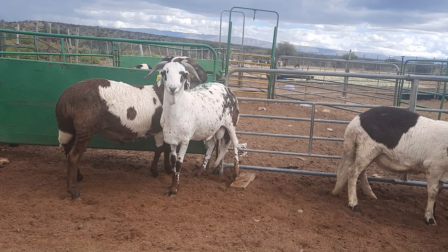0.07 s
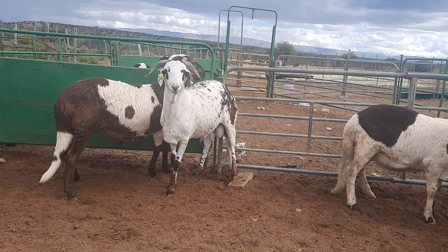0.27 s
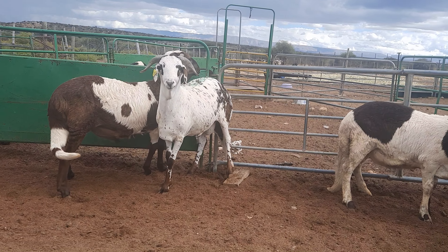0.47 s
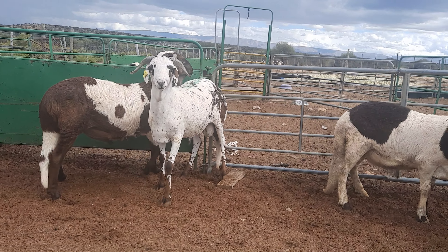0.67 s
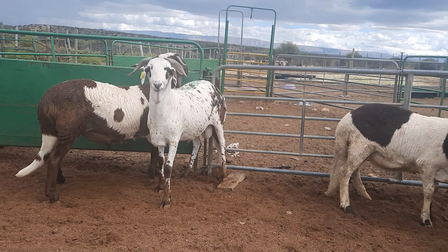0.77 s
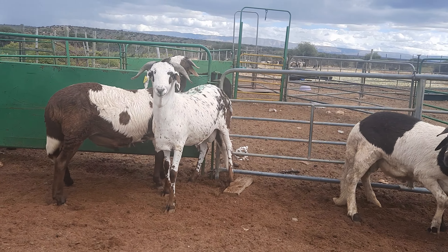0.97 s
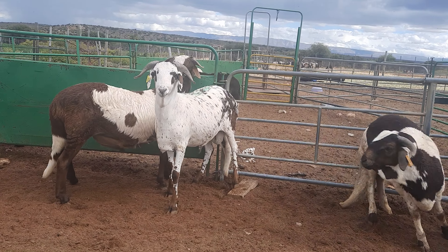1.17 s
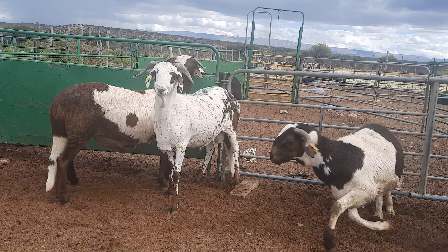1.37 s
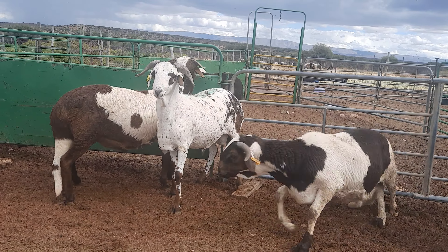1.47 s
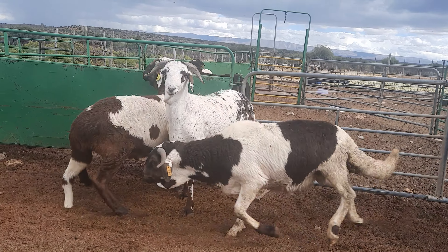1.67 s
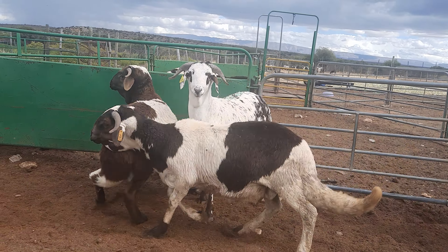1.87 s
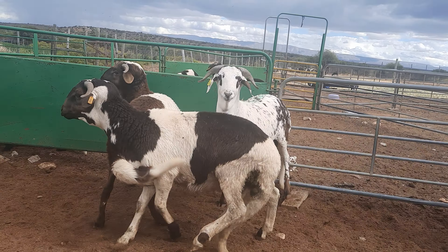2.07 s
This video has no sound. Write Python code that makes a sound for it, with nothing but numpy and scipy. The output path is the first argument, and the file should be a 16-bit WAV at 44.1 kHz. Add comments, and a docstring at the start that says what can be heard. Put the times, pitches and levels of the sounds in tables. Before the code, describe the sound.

Sheep hooves move on dirt in an open-air pen. Faint birds chirp from the start, with a brighter slurred whistle at 0.2-0.35 s. Low wind buffets the microphone at 0.2-0.6 s; scuffs and dull knocks cluster at 0.45-0.7 s. A sharp gritty tick comes at 1 s, a quick warble at 1.15 s, trotting scuffs at 1.25-1.55 s, soft thuds near 1.8 s, and a dry clack at 2.04 s.

```python
"""Sheep shift and trot on the dirt of an open-air pen, over coloured background noise.
Birds chirp and twitter from the start: wavering sine whistles with echoes. A gust of port noise swells at 0.2 s.
Ground rumble, a faint resonant drone and a close rubbing hiss grow; hooves scuff (grain showers) and
knock (damped sines). Grit ticks (filtered bursts) at 1 s and 1.8 s; a modal clack comes at 2.04 s."""
import sys
import numpy as np
from scipy import signal
from scipy.fft import rfft, irfft
from scipy.io import wavfile
from scipy.ndimage import uniform_filter1d

SR = 44100
rng = np.random.default_rng(int(sys.argv[2]) if len(sys.argv) > 2 else 0)


def digitize_waveform(pressure):
    """Quantize a signal to 16-bit integers and store it at the path in sys.argv[1].

    Rows of a 2-D input are taken as channels; values are limited to [-1, 1].
    """
    field = np.atleast_2d(pressure).T
    bounded = np.clip(field, -1, 1)
    quanta = np.round(bounded * 32767).astype(np.int16)
    wavfile.write(sys.argv[1], SR, quanta)


N = 94815
T, HZ = np.arange(N) / SR, np.fft.rfftfreq(N, 1 / SR)

# Spectrum of hooves on dirt. Each row: frequency in Hz, level in dB.
DIRT_SPECTRUM = [(100, -12), (350, -2), (680, -6), (1100, 1), (1600, 0.5), (2200, 4.5), (3400, -5),
                 (5000, -10.5), (8000, -22.5), (10000, -24.5), (16000, -62)]
FAR_T60_S = 0.16  # echoes of chirps and twitter
TICK_ECHO_DB, TICK_T60_S = -18, 0.13  # ticks and clack thrown back by the pen


def amp(db):
    """Decibels to gain."""
    return 10 ** (np.asarray(db) / 20)


def unit(x):
    """Scales to rms 1."""
    return x / np.sqrt(np.mean(x ** 2) + 1e-20)


def curve(points, t=T, axis=1):
    """Reads one column of a table over time."""
    p = np.array(points)
    return np.interp(t, p[:, 0], p[:, axis])


def over_hz(points):
    """Reads a spectrum on a log-frequency axis."""
    f, v = np.transpose(points)
    return np.interp(np.log(HZ + 1), np.log(f), v)


def pan(db):
    """Left and right gains of equal total power; positive dB is left."""
    return unit(amp([[db / 2], [-db / 2]]))


def add(mix, s, sound):
    """Mixes a sound in at time s."""
    part = mix[..., max(round(s * SR), 0):][..., :sound.shape[-1]]
    part += sound[..., :part.shape[-1]]


def late(x, s):
    """Delays a signal by s seconds."""
    return irfft(rfft(x) * np.exp(-2j * np.pi * HZ * s), N)


def colour(x, spectrum, tilt_db=0):
    """Filters by a spectrum and a tilt in dB per octave, then scales to rms 1."""
    tilt = tilt_db * np.log2(np.maximum(HZ, 300) / 1000)
    return unit(irfft(rfft(x) * amp(over_hz(spectrum) + tilt), N))


def wander(hz):
    """Smooth random motion of rms 1 up to about a rate."""
    return unit(irfft(rfft(rng.standard_normal(N)) * np.exp(-(HZ / hz) ** 2), N))


def diffuse(x):
    """Two unrelated signals become a port pair, alike in the bass."""
    # Each row: frequency in Hz, left-right coherence.
    coherence = [(30, 0.87), (150, 1), (300, 0.91), (640, 0.59), (1400, 0.066), (3100, -0.086),
                 (16000, 0.0028)]
    a, b = rfft(x)
    c = np.clip(over_hz(coherence), -1, 1)
    return irfft(np.array([a, c * a + np.sqrt(1 - c ** 2) * b]), N)


def noise(spectrum):
    """Diffuse stereo noise of a given colour."""
    return colour(diffuse(rng.standard_normal((2, N))), spectrum)


def steady(x, size=1500):
    """Takes slow chance swells out of a noise, so that its control sets the level."""
    power = np.atleast_2d(x ** 2).mean(0)
    power = uniform_filter1d(uniform_filter1d(power, size), size)
    return x / np.sqrt(abs(power) + 1e-6)


def resonance(hz, width_hz):
    """Stereo noise in one resonance that follows a pitch curve."""
    turn = np.exp(2j * np.pi * np.cumsum(hz * np.ones(N)) / SR)
    r = np.exp(-np.pi * width_hz / SR)
    # shift down to 0 Hz, filter there, shift back
    base = diffuse(rng.standard_normal((2, N))) / turn
    return unit((turn * signal.lfilter([1], np.poly([r, r]), base)).real)


def yard(x, t60_s):
    """Sparse random echoes off rails and panels, dying away exponentially."""
    t = T[:SR // 2]
    hits = rng.random((2, len(t))) < 2000 / SR
    taps = rng.standard_normal((2, len(t))) * hits * (t > .004) * amp(-60 * t / t60_s)
    return signal.fftconvolve(x, unit(taps) / np.sqrt(len(t)), axes=1)[:, :N]


def dull(x):
    """Echoes lose their treble on the way."""
    corner_hz = 6050
    return irfft(rfft(x) / np.sqrt(1 + (HZ / corner_hz) ** 6), N)


def air():
    """Open-air background: coloured diffuse noise whose level wavers."""
    # Each row: frequency in Hz, level in dB.
    air_spectrum = [(30, 13), (100, 17.5), (300, 7), (600, -1), (1100, -2.5), (1800, -6), (2800, -3),
                    (4200, -1.5), (5600, -2), (7000, -7.5), (10000, -13), (16000, -15)]
    # Each row: time in seconds, level in dB.
    air_level = [(0, -67), (.2, -68), (.36, -58.5), (.8, -63), (.95, -65.5), (1.15, -59.5), (1.65, -66),
                 (1.88, -61), (2, -66), (2.15, -58.5)]
    return amp(curve(air_level) + wander(33)) * noise(air_spectrum) * pan(-3.5)


def birds():
    """Nearly pure, slightly wavering whistles that reach the right port first, with echoes."""
    # Slurred notes and a quick warble of the nearest birds, a list of points per note.
    # Each point: time in seconds, pitch in Hz, level in dB before the near gain.
    song_notes = [
        [(.210, 5360, -62), (.222, 5280, -56), (.230, 4900, -44.5), (.243, 4260, -50), (.257, 4186, -39),
         (.265, 4357, -45.5), (.273, 4344, -42.5), (.284, 4140, -42.5), (.290, 3760, -55), (.297, 3640, -50.5),
         (.311, 2590, -52)],
        [(.318, 2520, -46), (.325, 3020, -50), (.331, 3840, -45.5), (.339, 4210, -44), (.344, 4210, -47),
         (.351, 4010, -42), (.363, 3270, -46.5)],
        [(1.124, 2580, -54), (1.131, 3550, -58), (1.137, 4040, -55), (1.142, 3550, -52), (1.147, 2980, -63)],
        [(1.151, 2900, -56), (1.157, 3680, -56), (1.161, 4450, -61)],
        [(1.173, 3370, -70), (1.179, 4380, -53), (1.186, 4660, -58), (1.194, 4380, -59), (1.199, 3890, -60),
         (1.212, 3850, -56), (1.224, 4020, -61), (1.234, 3840, -71)],
    ]
    # Far chirps. Each row: start in seconds, length in seconds, start, middle and end pitch in Hz,
    # level in dB before the far gain, left-right balance in dB.
    far_chirps = [(.000, 0.0082, 4890, 5420, 5150, -62, -1), (0.023, 0.043, 4230, 3650, 3010, -61, -7.5),
                  (0.104, 0.0076, 5740, 5670, 5540, -58.5, -11),
                  (0.111, 0.037, 5510, 5600, 5770, -69.5, -1), (0.097, 0.042, 1890, 1892, 1900, -68, 26),
                  (0.15, 0.044, 1870, 1941, 1940, -62, 7.5), (0.213, 0.08, 1933, 1930, 1914, -70, 17),
                  (0.384, 0.018, 6550, 6000, 5670, -61, -1), (0.495, 0.026, 4640, 4050, 3660, -52, -11),
                  (0.802, 0.03, 4230, 4680, 4270, -64, -20), (0.876, 0.033, 3290, 3560, 3590, -69, -13),
                  (.908, 0.04, 5570, 5180, 4900, -76.5, 0), (0.915, 0.03, 3450, 3170, 2900, -73, -15),
                  (1.011, .019, 4180, 3620, 3450, -64.5, -7), (1.038, .015, 3150, 2860, 2750, -60.5, -6),
                  (1.084, 0.014, 4130, 3360, 2560, -63, -14), (1.113, 0.0093, 4400, 4100, 3550, -67, -8),
                  (1.196, 0.0061, 8000, 8000, 8050, -66, -7), (1.208, 0.02, 7240, 7400, 7450, -65, -3),
                  (1.327, 0.035, 3650, 3250, 2850, -67, -6), (1.365, 0.032, 5440, 5270, 4660, -70.5, 2),
                  (1.789, 0.023, 4320, 3900, 3840, -63, -8), (1.868, 0.0088, 7700, 7880, 7700, -55, -9),
                  (1.879, 0.031, 7550, 7350, 7800, -53.5, -15), (2.041, 0.016, 4600, 4100, 3550, -62, -14)]
    near_gain, far_gain = amp(-4.5), amp(-1.5)
    song_pan_db, left_lag_s = -16, 0.00023
    near_echo_db, near_t60_s, far_echo_db = -6.5, 0.14, -8
    pitch_waver, flutter_db = 0.004, 2.2  # rms; pitch as a fraction
    near, far = np.zeros((2, 2, N))
    drift = 1 + pitch_waver * wander(380)
    flutter = amp(flutter_db * wander(240))

    def whistle(start, hz, gain, pan_db):
        """Sine along a pitch curve."""
        at = (round(start * SR) + np.arange(len(hz))) % N
        tone = np.sin(2 * np.pi * np.cumsum(hz * drift[at]) / SR)
        return np.sqrt(2) * pan(pan_db) * gain * flutter[at] * tone

    for note in song_notes:
        t = np.arange(note[0][0], note[-1][0], 1 / SR)
        edge = np.clip(np.minimum(t - t[0], t[-1] - t) / 0.0011, 0, 1)
        hz = uniform_filter1d(curve(note, t), 200, mode="nearest")
        gain = edge * amp(curve(note, t, axis=2))
        add(near, t[0], whistle(t[0], hz, gain, song_pan_db))
    for start, length, a, b, c, db, pan_db in far_chirps:
        u = np.linspace(0, 1, round(length * SR))
        hz = np.polyval(np.polyfit([0, .5, 1], [a, b, c], 2), u)
        gain = amp(db) * np.sqrt(abs(np.sin(np.pi * u)))
        add(far, start, whistle(start, hz, gain, pan_db))
    near, far = near_gain * near, far_gain * far
    left, right = near + far
    echoes = amp(near_echo_db) * yard(near.mean(0, keepdims=True), near_t60_s)
    echoes = echoes + amp(far_echo_db) * yard(far.mean(0, keepdims=True), FAR_T60_S)
    return np.array([late(left, left_lag_s), right]) + pan(1) * dull(echoes)


def twitter():
    """Many far birds, each note a quick random arch of pitch, blurred by echoes."""
    # Each row: time in seconds, level in dB.
    twitter_level = [(0, -72), (.06, -76), (.12, -75), (.19, -83), (.4, -73), (.72, -90), (.84, -74),
                     (.97, -80), (1.08, -74), (1.15, -69), (1.22, -71), (1.36, -74), (1.65, -85),
                     (1.9, -86), (2.15, -72)]
    low_hz, high_hz, swing = 3430, 4640, 0.266  # range of arch tops; depth of arch
    note_s = 0.024  # mean length
    out = np.zeros((1, N))
    for when, pitch, length, shape in rng.random(size=(400, 4)):
        u = np.linspace(0, 1, round(note_s * (.5 + length) * SR))
        top_hz = low_hz + pitch * (high_hz - low_hz)
        hz = top_hz * (1 - swing * (u + shape - 1) ** 2)
        add(out, when * N / SR, np.sin(np.pi * u) * np.sin(2 * np.pi * np.cumsum(hz) / SR))
    blurred = steady(unit(yard(out, FAR_T60_S)))
    return amp(curve(twitter_level)) * blurred * pan(-13)


def wind():
    """Eddies buffet each microphone port separately: independent low noises."""
    # Wind pressure at each port. Each row: time in seconds, level in dB.
    gust_left = [(0, -67), (.04, -58), (.06, -47.5), (.13, -54.5), (.185, -59.5), (.222, -27.5),
                 (.26, -38.5), (.315, -34.5), (.40, -47), (.428, -27), (.455, -36), (.495, -26), (.54, -41),
                 (.6, -39.5), (.68, -55.5), (.78, -45.5), (.92, -58), (1.03, -48.5), (1.22, -66),
                 (2.15, -85)]
    gust_right = [(0, -59), (.2, -66), (.265, -40), (.38, -46.5), (0.462, -62), (0.502, -38), (.58, -54),
                  (.72, -63), (.78, -42), (.84, -45.5), (.89, -55), (.96, -48), (1.05, -48.5), (1.2, -85),
                  (1.68, -54.5), (2, -73)]
    # Each row: frequency in Hz, level in dB.
    wind_spectrum = [(15, -42), (35, -19), (58, 9.5), (100, 2), (150, -5), (210, -13.5), (290, -19.5),
                     (420, -28.5), (800, -88), (3000, -65)]
    ports = []
    for gust in (gust_left, gust_right):
        buffet = steady(colour(rng.standard_normal(N), wind_spectrum), size=900)
        ports.append(amp(curve(gust)) * buffet)
    return np.array(ports)


def trampling():
    """The low, lumpy sound of the flock moving on soft earth: noise of random level."""
    # Each row: time in seconds, level in dB before the overall gain.
    trample_level = [(0, -85), (.18, -69), (.33, -54), (.5, -47), (.62, -51.5), (.8, -59), (1.04, -59.5),
                     (1.16, -55), (1.23, -64), (1.28, -53.5), (1.4, -53), (1.47, -43.5), (1.58, -49.5),
                     (1.64, -50), (1.72, -49.5), (1.83, -54), (1.87, -53), (1.94, -60.5), (2.07, -61.5),
                     (2.1, -55.5), (2.15, -53)]
    # Each row: frequency in Hz, level in dB.
    ground_spectrum = [(20, -37), (60, -4.5), (120, 4), (180, 6), (230, -5), (300, -8), (430, -8.5),
                       (600, -14), (1100, -18.5), (1800, -41), (5000, -49)]
    gain_db, pan_db = -2.5, 0.1
    lumps_db = 2.2 * wander(28)
    level = amp(gain_db + curve(trample_level) + lumps_db)
    return pan(pan_db) * level * steady(noise(ground_spectrum))


def drone():
    """Faint hollow drone: noise in two narrow low resonances; the lower one drifts."""
    # Each row: time in seconds, low resonance in Hz, its level in dB, upper level in dB.
    drone_track = [(0, 289, -72, -95), (.2, 286, -68.5, -93), (.35, 299, -50, -86), (.6, 285, -66, -69),
                   (.76, 281, -54, -61.5), (.88, 283, -58, -66), (1.03, 274, -65, -68.5),
                   (1.17, 307, -56, -72.5), (1.3, 314, -59.5, -68.5), (1.45, 302, -54.5, -77),
                   (1.6, 289, -61, -64.5), (1.78, 296, -61, -79.5), (1.95, 301, -68, -72),
                   (2.15, 295, -66, -72)]
    low_width_hz, upper_hz, upper_width_hz = 70, 587, 85
    low = steady(resonance(curve(drone_track), low_width_hz), size=2500)
    upper = steady(resonance(upper_hz, upper_width_hz), size=2500)
    low = amp(curve(drone_track, axis=2)) * low
    upper = amp(curve(drone_track, axis=3)) * upper
    return (low + upper) * pan(-0.76)


def rubbing():
    """Close friction hiss in a resonance that rises, then falls, under a fine high rustle."""
    # Each row: time in seconds, resonance in Hz, level in dB.
    rub_track = [(.2, 5650, -74.5), (.36, 5640, -65), (.45, 5600, -80), (.56, 6250, -67.5),
                 (.68, 6060, -67.5), (.78, 5970, -64), (.93, 6700, -68), (1.05, 7500, -67.5),
                 (1.18, 7400, -73.5), (1.3, 6760, -72), (1.48, 6180, -102), (1.54, 5800, -63),
                 (1.62, 5900, -103)]
    # Each row: time in seconds, level in dB.
    rustle_level = [(0, -91), (.2, -81), (.35, -64.5), (.46, -73), (.7, -70.5), (.78, -59.5), (.92, -82),
                    (1.02, -63.5), (1.17, -77), (1.48, -71), (1.575, -59.5), (1.66, -72.5), (1.88, -69),
                    (2, -70), (2.15, -66.5)]
    # Each row: frequency in Hz, level in dB.
    rustle_spectrum = [(300, 6), (2000, 3), (5000, -21.5), (8300, 1.5), (9500, -7), (12000, 1.5),
                       (14500, -3.5), (16000, -1)]
    width_hz = 1860
    hiss = amp(curve(rub_track, axis=2) + 1.6 * wander(140)) * resonance(curve(rub_track), width_hz)
    rustle = amp(curve(rustle_level) + 0.98 * wander(99)) * noise(rustle_spectrum)
    return hiss * pan(-0.84) + rustle * pan(-2.5)


def scuffs():
    """Each drag of a hoof sets off a shower of tiny grains, heard directly and off the ground."""
    # Each row: start, rise, hold and fall in seconds, level in dB, brightness in dB per octave.
    scuff_rows = [(0.284, 0.078, 0.023, 0.096, -54.5, -1), (0.478, 0.0044, 0.0056, 0.0043, -48, -5),
                  (0.488, 0.014, 0.097, 0.066, -53.5, -5), (0.644, 0.0059, 0.03, 0.0097, -52, -7),
                  (0.763, 0.027, 0.77, 0.18, -64, -8), (1.2386, .0008, 0.021, 0.026, -53, 1.5),
                  (1.264, 0.014, 0.044, 0.14, -54.5, -6.5), (1.426, 0.0023, 0.023, 0.047, -49, 0.75),
                  (1.495, 0.02, 0.036, 0.028, -58, -5.5), (1.863, 0.00063, 0.0077, 0.0026, -51.5, -12.5),
                  (2.077, 0.019, 0.035, 0.027, -57.5, -4)]
    grit_db, grit_per_s = 1.3, 9000
    bite_start_db, bite_s = 3, 0.017  # extra level at the onset
    left_lag_s, scatter = 0.00029, 1
    bounce_s, bounce = 0.0039, 0.21
    out = np.zeros((3, N))
    for start, rise, hold, fall, db, tilt_db in scuff_rows:
        size = amp(grit_db * np.minimum(rng.exponential(1, N), 4))
        size = size * (rng.random(N) < grit_per_s / SR)
        grains = colour(size * rng.standard_normal((3, N)), DIRT_SPECTRUM, tilt_db)
        t = T - start
        bite_db = bite_start_db * np.exp(-np.maximum(t, 0) / bite_s)
        shape = np.clip(t / rise, 0, 1) * np.exp(-np.maximum(t - rise - hold, 0) / fall)
        out += amp(db + bite_db) * shape * grains
    direct = np.array([late(out[2], left_lag_s), out[2]])
    ports = (direct + scatter * diffuse(out[:2])) / np.hypot(1, scatter)
    return (ports + bounce * late(ports, bounce_s)) * pan(-3)


def knocks():
    """A dull hoof blow rings for a few cycles, with a little crunch."""
    # Each row: start in seconds, pitch in Hz, level in dB, Gaussian decay in seconds.
    knock_rows = [(0.4833, 314, -34.5, 0.001), (0.5222, 1400, -47.5, 0.0022), (.544, 946, -45, 0.0032),
                  (.5495, 645, -40, 0.0012), (0.5804, 1200, -42.5, 0.00068), (.6, 1020, -51, 0.0015),
                  (0.6387, 396, -28, 0.0038), (.653, 546, -37.5, 0.0024), (0.6649, 405, -39, 0.0013),
                  (0.674, 850, -45, 0.0018), (1.772, 264, -43.5, 0.0051), (1.861, 420, -44, 0.0019),
                  (1.866, 344, -42.5, 0.0034), (2.124, 905, -51, 0.0057)]
    rise_s, crunch_gain = 0.00063, 0.088
    out, t, crunch = np.zeros((2, N)), T[:3000], noise(DIRT_SPECTRUM)
    for start, hz, db, decay in knock_rows:
        fall = np.exp(-(np.maximum(t - rise_s, 0) / decay) ** 2 / 2)
        shape = np.minimum(t / rise_s, 1) * fall
        grit = np.roll(crunch, -round(start * SR), 1)[:, :len(t)]
        add(out, start, amp(db) * shape * (np.sin(2 * np.pi * hz * t) + crunch_gain * grit))
    return out


def ticks():
    """Grit and metal: a brief thin burst, coloured by the struck surface, with one short ring."""
    # Each row: peak time in seconds, level in dB, rise and decay in seconds, brightness in dB per
    # octave, high-pass in Hz, ring in Hz, ring level in dB, ring decay in seconds, left-right dB.
    tick_rows = [(0.974, -41.5, .0026, 0.0043, 2, 5000, 5400, -56, 0.0023, -1),
                 (0.9914, -29, 0.00069, 0.00022, 4.5, 2470, 1905, -46.5, 0.0045, -6),
                 (1.772, -55, 0.00032, 0.0077, -4, 3000, 3670, -85, 0.0026, -7),
                 (1.798, -54, 0.00052, .002, -7, 1780, 2400, -84, 0.0012, -3)]
    # Each row: frequency in Hz, level in dB.
    tick_spectrum = [(1000, -7), (5500, -6), (8000, -2), (9500, -7.5), (12000, -2), (14500, -6),
                     (16000, -2.5)]
    out = np.zeros((2, N))
    for at, db, rise, decay, tilt_db, low_hz, hz, ring_db, ring_s, pan_db in tick_rows:
        t = T - at
        after = np.maximum(t, 0)
        shape = np.exp(np.minimum(t, 0) / rise - after / decay)
        high_pass = signal.butter(6, low_hz, "high", fs=SR, output="sos")
        burst = signal.sosfilt(high_pass, rng.standard_normal((2, N)) * shape)
        crack = colour(burst, tick_spectrum, tilt_db) * np.sqrt(np.mean(shape ** 2))
        ring = np.sin(2 * np.pi * hz * after) * np.exp(-after / ring_s) * np.minimum(after * hz, 1)
        out += pan(pan_db) * (amp(db) * crack + amp(ring_db) * ring)
    return out + amp(TICK_ECHO_DB) * yard(out, TICK_T60_S)


def clack():
    """One hard, dry blow, like a kicked stone, rings a few heavily damped modes."""
    # Each row: frequency in Hz, level in dB before the overall gain, decay in seconds.
    clack_modes = [(1090, -14, 0.003), (1860, -3, 0.00086), (2510, 1, 0.00098), (2770, -16, 0.0022),
                   (5540, 4, 0.00039), (7800, -2.5, 0.0005), (10800, -0.5, 0.00021)]
    start_s, gain_db, rise_s, pan_db = 2.0426, -35.5, 0.00014, -7
    t = np.maximum(T - start_s, 0)
    ring = np.zeros(N)
    for hz, db, decay in clack_modes:
        ring += amp(db) * np.sin(2 * np.pi * hz * t) * np.exp(-t / decay)
    out = amp(gain_db) * np.minimum(t / rise_s, 1) * ring * pan(pan_db)
    return out + amp(TICK_ECHO_DB) * yard(out, TICK_T60_S)


def scene():
    """Birds, hooves and wind over the open-air background."""
    surroundings = air() + birds() + twitter() + wind()
    flock = trampling() + drone() + rubbing() + scuffs() + knocks()
    return surroundings + flock + ticks() + clack()


def record(dry):
    """The recorder's band limit: a linear-phase low-pass."""
    edge_hz = 15900
    low_pass = signal.firwin(401, edge_hz, window=("kaiser", 8), fs=SR)
    return signal.oaconvolve(dry, low_pass[None], "same")


dry = scene()
out = record(dry)
digitize_waveform(out)
```